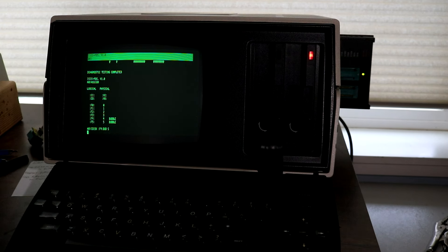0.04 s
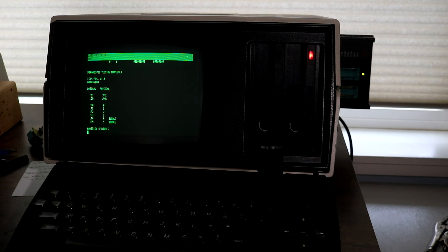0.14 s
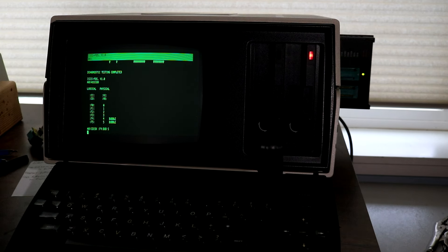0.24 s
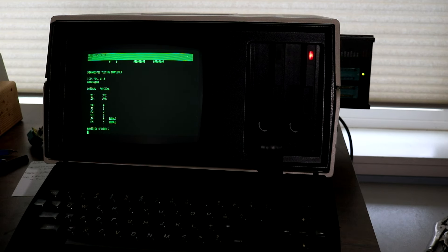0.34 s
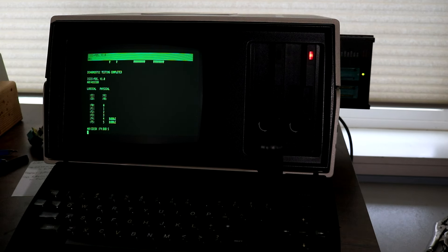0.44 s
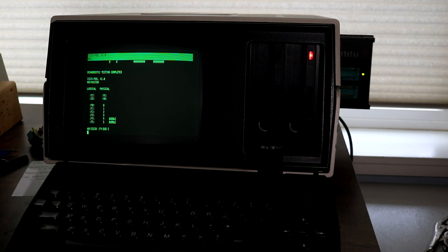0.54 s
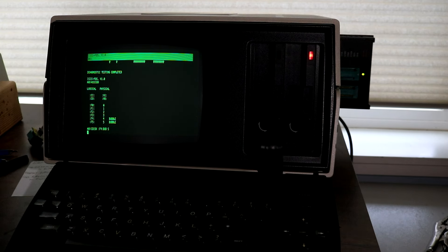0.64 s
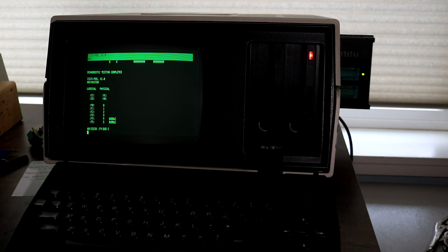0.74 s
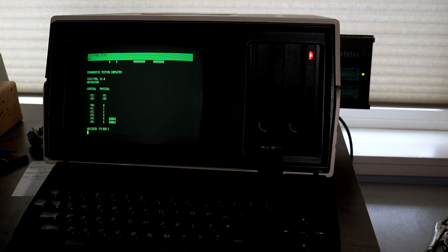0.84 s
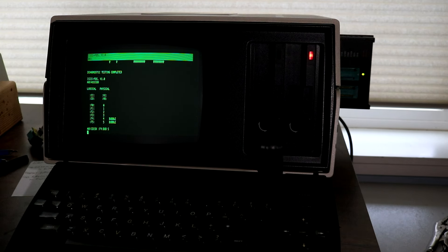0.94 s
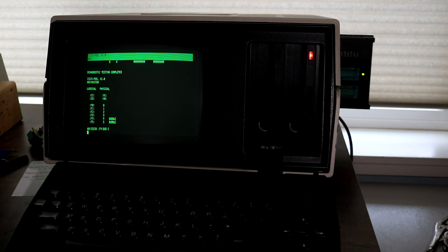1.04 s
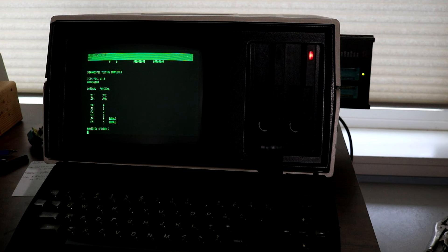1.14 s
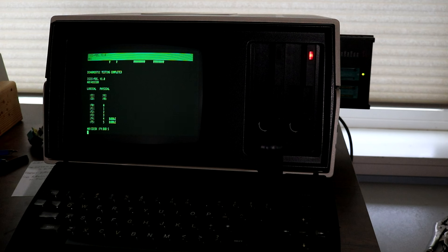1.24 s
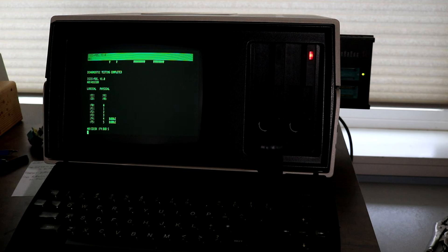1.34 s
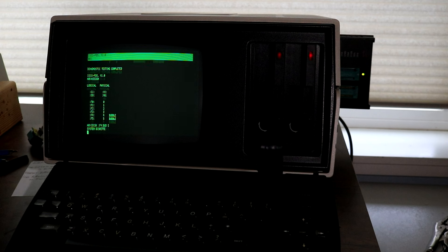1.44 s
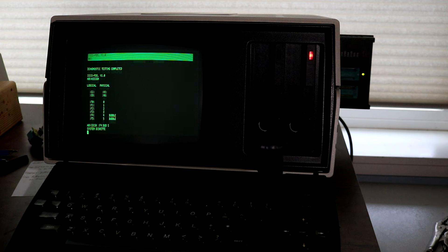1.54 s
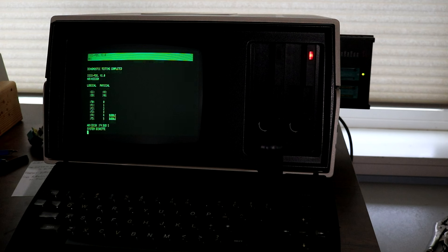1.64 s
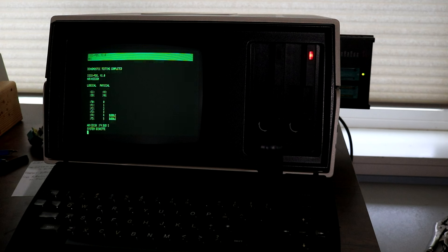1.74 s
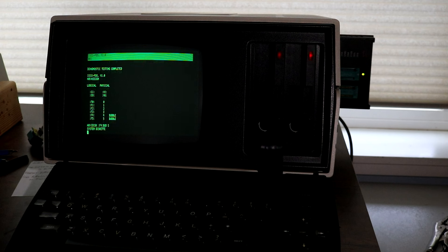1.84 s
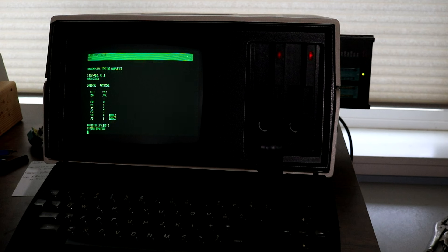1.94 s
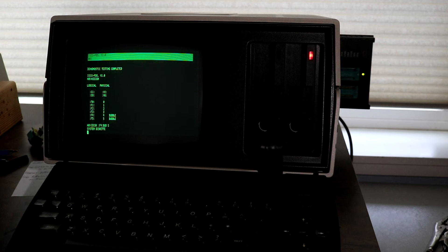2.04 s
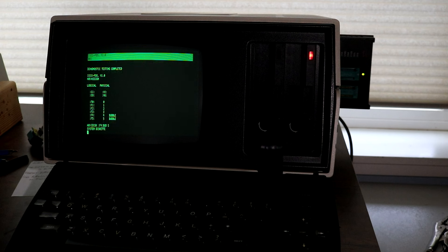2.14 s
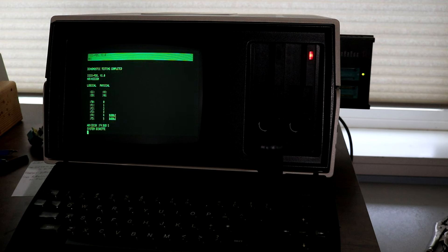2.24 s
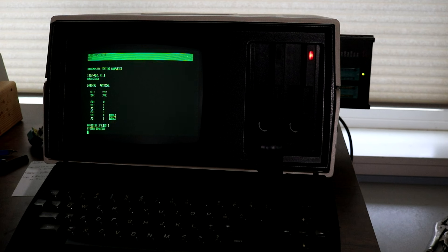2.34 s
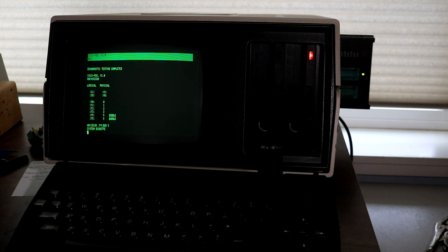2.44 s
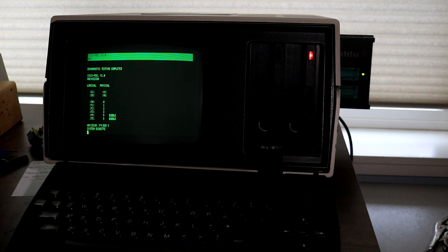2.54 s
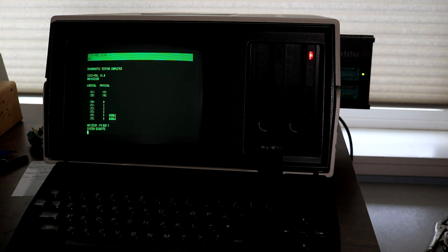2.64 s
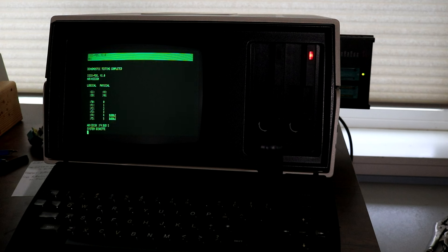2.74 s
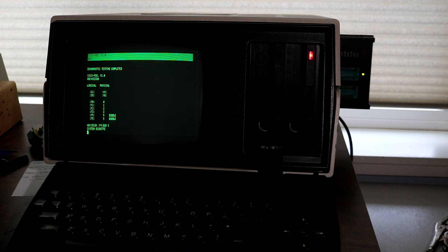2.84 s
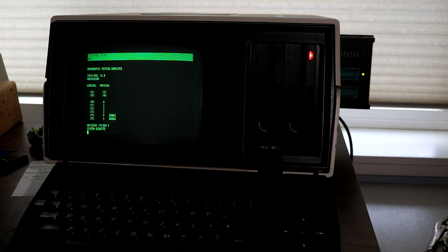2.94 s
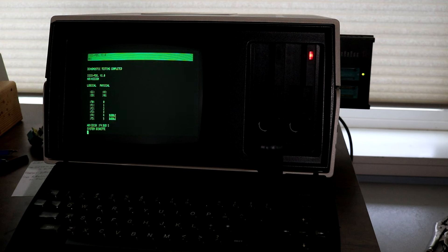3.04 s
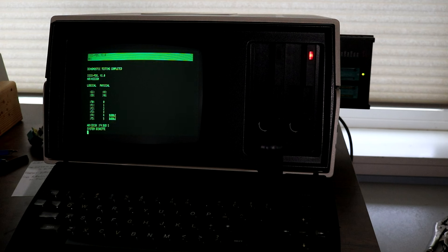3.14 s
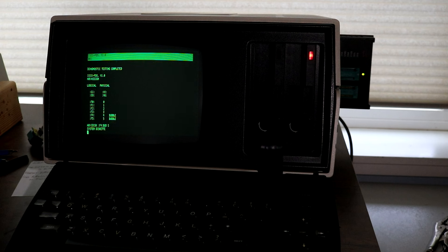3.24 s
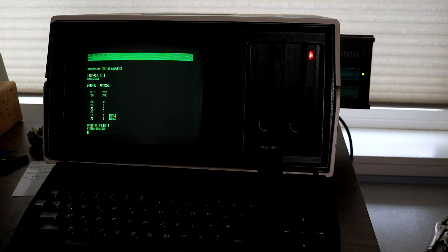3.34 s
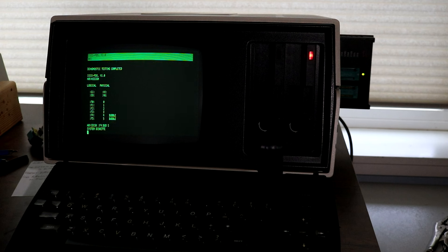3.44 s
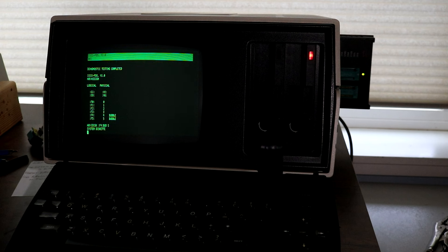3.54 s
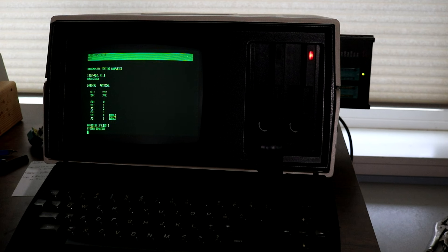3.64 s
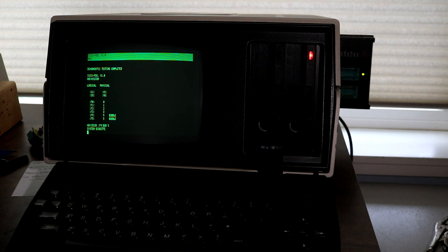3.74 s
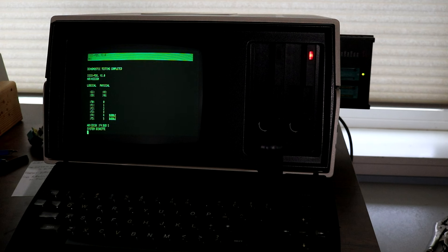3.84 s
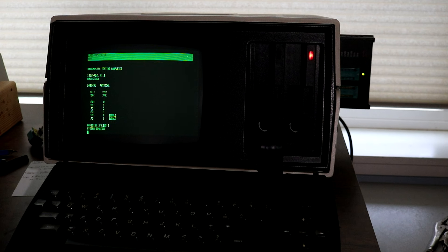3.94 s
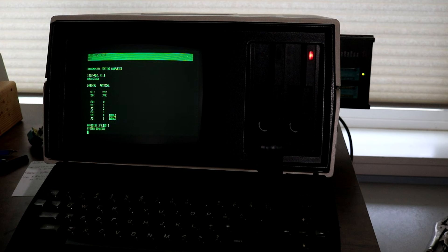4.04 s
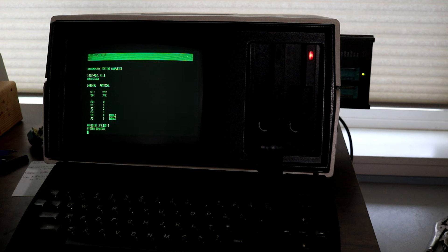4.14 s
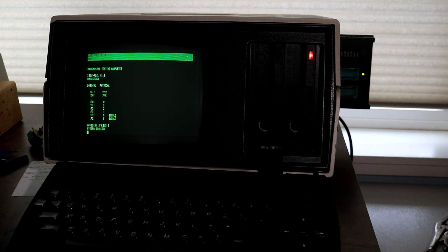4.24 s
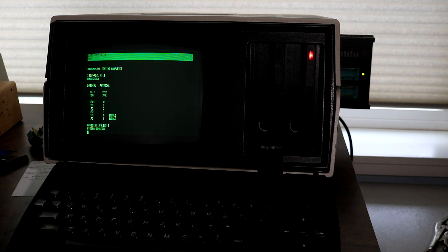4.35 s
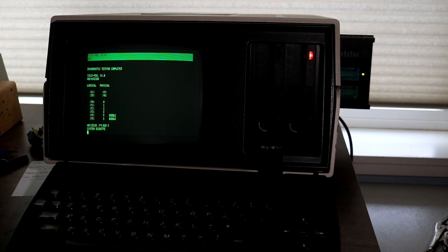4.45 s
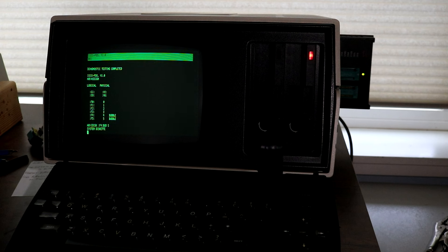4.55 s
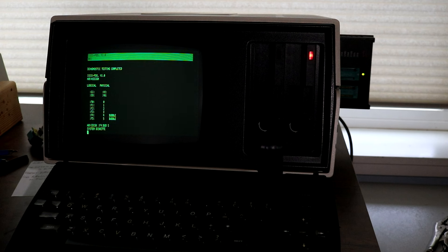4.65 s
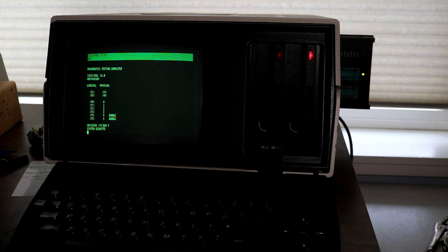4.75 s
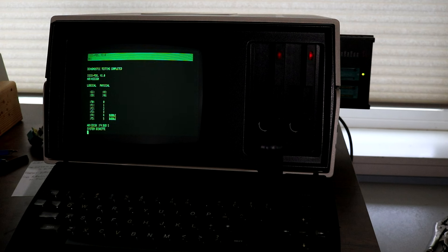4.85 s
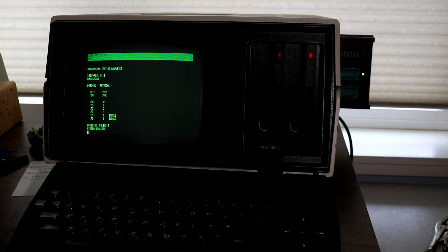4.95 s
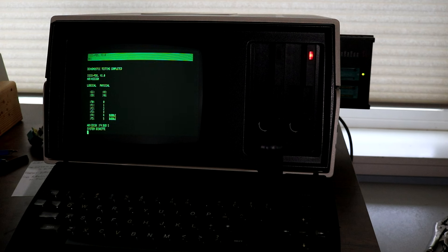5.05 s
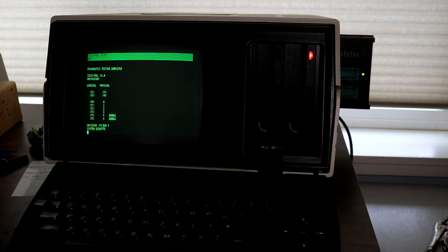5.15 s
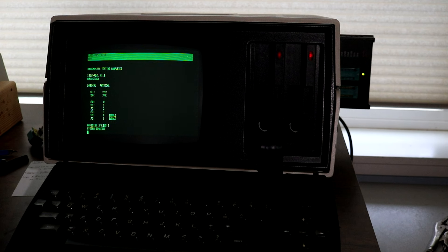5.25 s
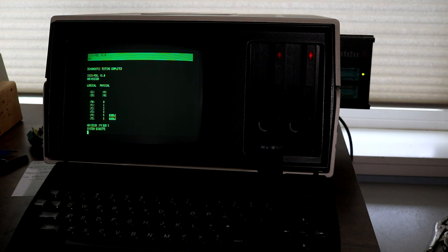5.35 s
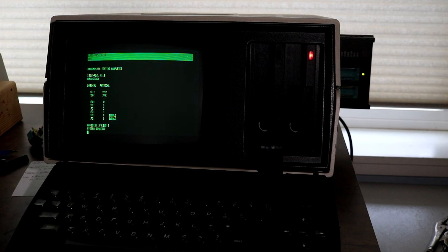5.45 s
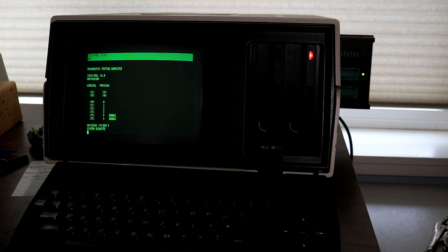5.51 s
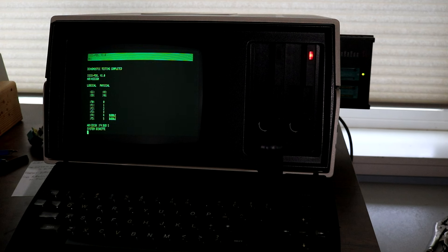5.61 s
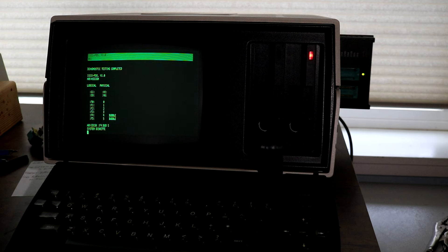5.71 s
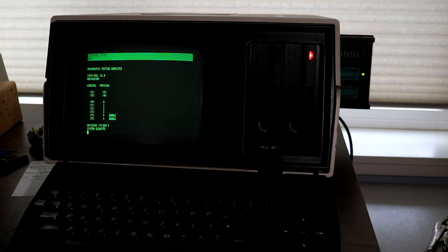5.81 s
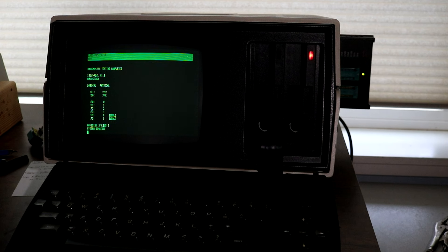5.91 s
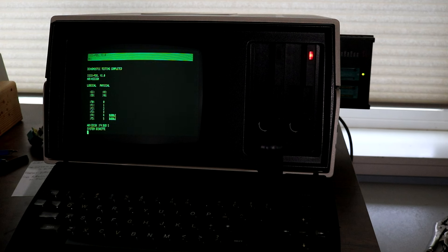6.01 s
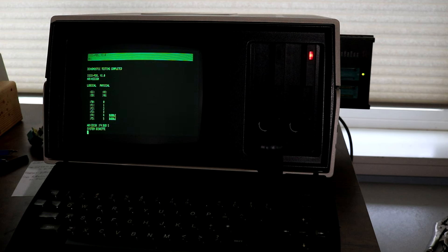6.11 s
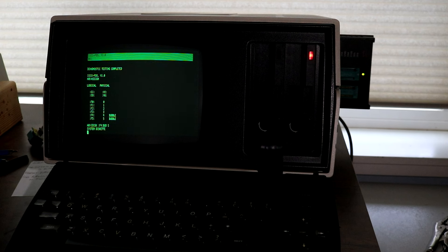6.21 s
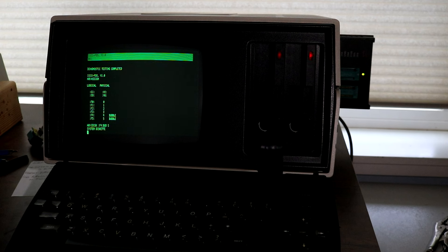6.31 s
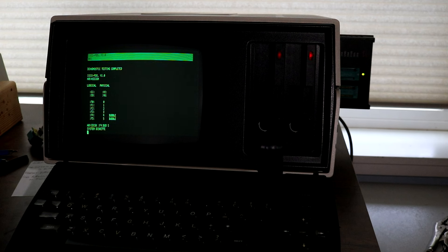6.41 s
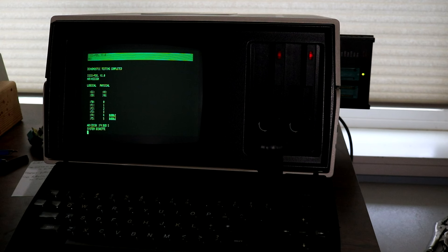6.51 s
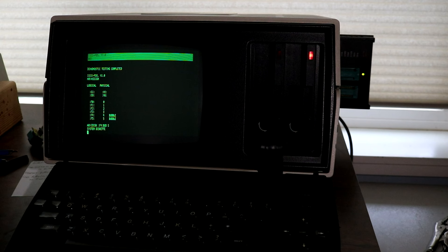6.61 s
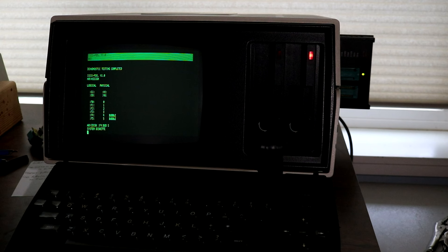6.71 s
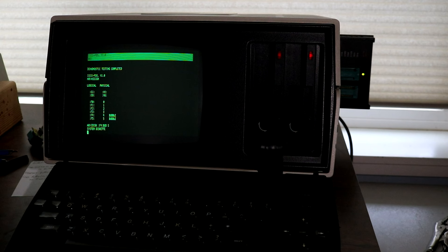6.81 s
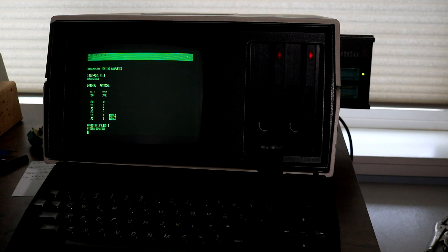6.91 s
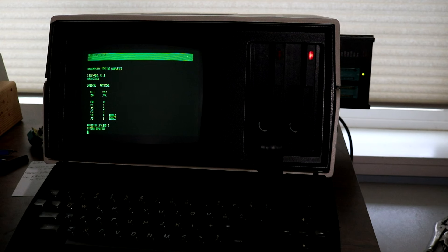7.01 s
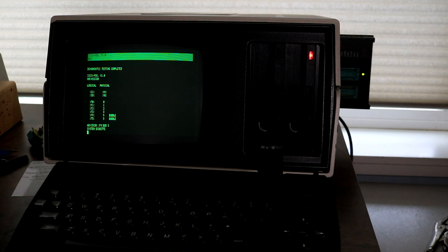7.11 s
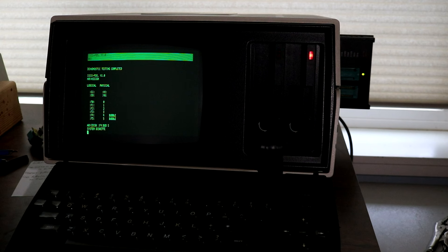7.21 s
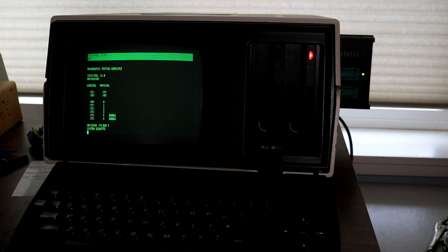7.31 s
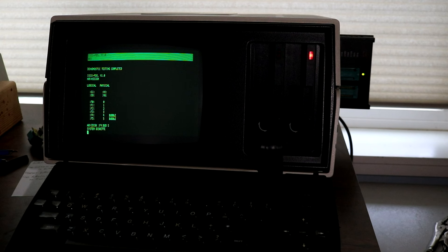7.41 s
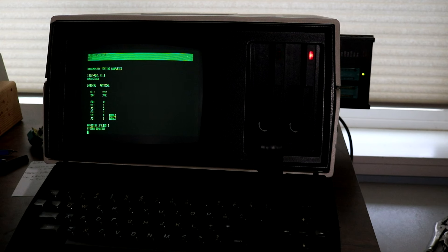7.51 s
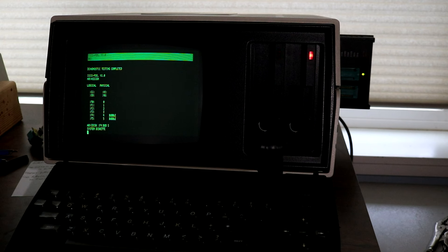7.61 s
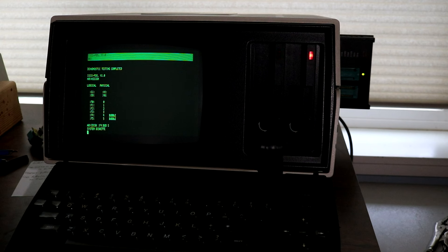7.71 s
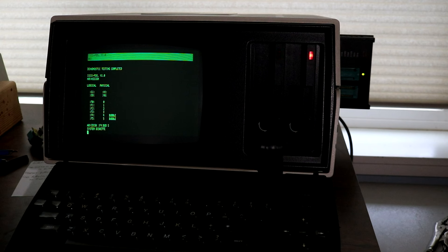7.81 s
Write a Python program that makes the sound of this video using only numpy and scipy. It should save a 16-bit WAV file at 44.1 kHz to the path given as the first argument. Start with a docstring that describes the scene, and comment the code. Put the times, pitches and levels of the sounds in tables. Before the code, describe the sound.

An old portable computer runs in a small room, with soft fan noise, a low mains hum and a thin, very high picture tube whine throughout. In the first second its floppy drive gives a few light ticks, a faint swish and a small double knock at about 0.7 seconds. At 1.4 seconds the head motor makes a very short, pitched buzz that ends in a hard, bright clack. A longer buzz follows at 1.8 and clacks just after 2 seconds. The drive then rests, apart from a small knock at 3.5. Four more buzzes, each about a quarter of a second long, start at 4.8, 5.2, 6.3 and 6.8 seconds, their tone shifting slightly as the head runs out and back. Each stops with a sharp clack and a brief rattle, the loudest sounds here. One last small knock comes at 7.5 seconds.

```python
"""A floppy drive's stepper motor runs the head to and fro in an old portable computer, in a small room.
Each seek is a periodic train of impacts on the frame, heard as a buzz with motor tones, and ends in a
hard clack against a stop. Short nudges, light ticks and one faint swish fall between the seeks.
Fan noise, mains hum and the picture tube's whine go on throughout; a limiter ducks after each clack."""
import sys
import numpy as np
from scipy import signal
from scipy.fft import rfft, irfft, next_fast_len
from scipy.io import wavfile
from scipy.ndimage import uniform_filter1d

SR = 44100
rng = np.random.default_rng(int(sys.argv[2]) if len(sys.argv) > 2 else 0)


def to_wav(s):
    """Save 16-bit WAV."""
    ch = np.atleast_2d(s).T  # columns
    pcm = np.round(np.clip(ch, -1, 1) * 32767)  # PCM
    wavfile.write(sys.argv[1], SR, pcm.astype(np.int16))


N = 347067
TAPS = 8192
HZ, TIME = np.fft.rfftfreq(TAPS, 1 / SR), np.arange(N) / SR


def amp(db):
    """Amplitude ratio: tenfold for every 20 dB."""
    return 10 ** (np.asarray(db) / 20)


def curve(points, hz=HZ):
    """Interpolation of (frequency_hz, value) points on a logarithmic frequency axis."""
    point_hz, value = np.transpose(points)
    return np.interp(np.log(hz + 1), np.log(point_hz + 1), value)


def peaks(rows):
    """Lorentzian curve in dB: one peak or dip for each row."""
    return sum(db / (1 + (2 * (HZ - hz) / width) ** 2) for hz, width, db in rows)


def add(mix, start_s, sound):
    """Superposition: a stereo sound joins the mix at start_s."""
    part = mix[:, round(start_s * SR):][:, :sound.shape[1]]
    part += sound[:, :part.shape[1]]


def colour(x, db):
    """Minimum-phase filtering at unit energy: only the shape of the dB curve counts."""
    log_gain = np.log(amp(np.maximum(db, db.max() - 100)))
    mirrored = np.r_[log_gain, log_gain[-2:0:-1]]
    response = np.exp(np.conj(signal.hilbert(mirrored)))
    taps = np.fft.ifft(response).real[:TAPS // 2]
    return signal.fftconvolve(x, taps[None] / np.linalg.norm(taps), axes=1)[:, :x.shape[1]]


def resonate(x, hz, width_hz):
    """Forced vibration of a damped resonator, with unit gain at its moving centre hz."""
    turn = np.exp(2j * np.pi * np.cumsum(hz) / SR)
    pole = np.exp(-np.pi * width_hz / SR)
    return 2 * (turn * signal.lfilter([1 - pole], [1, -pole], x / turn + 1e-18)).real


def ring(t60_s, rise_s=0.00021):
    """Modal overlap: a struck part with many close modes rings as decaying white noise of unit energy."""
    t = np.arange(TAPS) / SR
    burst = rng.standard_normal((2, TAPS)) * amp(-60 * t / t60_s) * (1 - np.exp(-t / rise_s))
    power = uniform_filter1d(abs(rfft(burst)) ** 2, size=70, axis=1)
    white = np.vstack([colour(side[None], -10 * np.log10(p + 1e-12)) for side, p in zip(burst, power)])
    return white / np.linalg.norm(white, axis=1, keepdims=True)


def impacts(events, spectrum, level_db, t60_s):
    """Impulse excitation: each (start_s, gain_db) blow rings a part with the given spectrum."""
    out = np.zeros((2, N))
    for start_s, gain_db in events:
        add(out, start_s, amp(level_db + gain_db) * ring(t60_s))
    return colour(out, curve(spectrum))


def stereo(x, coherence, balance, lag_samples=0):
    """Partial coherence: two unrelated signals blend into the sound at two close points; the left lags."""
    size = next_fast_len(x.shape[1] + 64)
    (a, b), hz = rfft(x, size), np.fft.rfftfreq(size, 1 / SR)
    angle = np.arccos(np.clip(curve(coherence, hz), -1, 1)) / 2
    mid, side = a * np.cos(angle), b * np.sin(angle)
    tilt = amp(curve(balance, hz) / 2)
    delay = np.exp(-2j * np.pi * hz * lag_samples / SR)
    return irfft(np.array([(mid + side) * tilt * delay, (mid - side) / tilt]), size)[:, :x.shape[1]]


def electrical_tone(hz, left_db, right_db):
    """Forced vibration at a fixed electrical frequency: a sine with the given rms levels."""
    return amp([[left_db], [right_db]]) * np.sqrt(2) * np.sin(2 * np.pi * hz * TIME)


# fan and room air: frequency_hz, gain_db
FAN_SPECTRUM = [(15, -71.5), (25, -43), (59, -16), (90, -13), (103, -10), (124, -6.5), (184, -5),
                (210, -11.5), (520, -14), (579, -16.5), (661, -15.5), (1070, -19), (1630, -23.5),
                (2250, -26), (14500, -39.5)]
# resonances of the case: frequency_hz, width_hz, gain_db
CASE_MODES = [(175.3, 23, 5), (298.7, 6.3, 5.5), (369, 10, 7), (593, 15, 7.5), (747, 4.8, 10.5),
              (1037, 12.7, 11), (1124, 14, 3.5), (2187, 85, 5.5)]
# left-right likeness of the fan: frequency_hz, coherence
FAN_COHERENCE = [(30, .8), (130, .99), (290, .96), (640, .8), (1400, .4), (3100, .2), (7000, .1)]
# balance of the fan: frequency_hz, left_minus_right_db
FAN_BALANCE = [(60, -5.5), (300, -1), (1300, -3.5), (2400, -2.5), (8000, 0.5)]
def fan(level_db=-45.5):
    """Turbulence: broadband air noise, filtered by the resonances of the case."""
    air = colour(rng.standard_normal((2, N)), curve(FAN_SPECTRUM) + peaks(CASE_MODES))
    return amp(level_db) * stereo(air, FAN_COHERENCE, FAN_BALANCE)


# reverberation time of the room: frequency_hz, t60_s
ROOM_DECAY = [(200, 0.49), (1000, 0.43), (3000, 0.32), (7000, 0.32), (14000, 0.28)]
def room(x, build_s=0.0017):
    """Reverberation: a diffuse tail of unit energy builds up, then decays exponentially in each band."""
    hz, t, bands = signal.stft(rng.standard_normal((2, SR // 2)), SR, nperseg=256)
    decay = amp(-60 * t / curve(ROOM_DECAY, hz)[:, None])
    onset = 1 - np.exp(-(t / build_s) ** 2)
    tail = signal.istft(bands * decay * onset, SR, nperseg=256)[1]
    return signal.fftconvolve(x, tail / np.linalg.norm(tail, axis=1, keepdims=True), axes=1)[:, :N]


# thin, bright rubbing: frequency_hz, gain_db
SWISH_SPECTRUM = [(500, -21), (2500, -6), (6000, -1), (10000, 0), (15000, -6)]
def swish(level_db=-54, start_s=0.24, rise_s=0.19, hold_s=0.14, fade_db_per_s=42):
    """Friction noise: a faint rubbing swells, holds and dies away."""
    age = np.maximum(TIME - start_s, 0)
    swell = np.sqrt(np.minimum(age / rise_s, 1))
    fade_db = -fade_db_per_s * np.maximum(age - rise_s - hold_s, 0)
    return swell * amp(level_db + fade_db) * colour(rng.standard_normal((2, N)), curve(SWISH_SPECTRUM))


# stray ticks of the mechanism: start_s, gain_db
STRAY_TICKS = [(0.0697, -14), (0.254, 1), (0.263, 2), (0.593, -16), (4.739, -13)]
# a light tick: frequency_hz, gain_db
TICK_SPECTRUM = [(590, -44), (1000, -17), (1590, -9), (2530, -15), (3000, -10.5), (6340, -6.5),
                 (9640, -5.5), (11600, -14.5), (15000, -14)]
def light_ticks(latch_s=0.016, latch_db=4):
    """Latch click: a head-load latch snaps with a light tick early in each seek; a few ticks are stray."""
    latches = [(start + latch_s, latch_db) for start, _, _ in HEAD_SEEKS]
    return impacts(STRAY_TICKS + latches, TICK_SPECTRUM, level_db=-9.5, t60_s=0.044)


# two-step nudges of the head: start_s, gain_db
HEAD_NUDGES = [(0.7289, 1.5), (3.5288, 2), (7.5296, 3.5)]
# a dull knock: frequency_hz, gain_db
KNOCK_SPECTRUM = [(200, -53), (520, -10), (700, 5), (1200, 3.5), (1700, -3), (2400, -10), (3200, -9),
                  (4300, -5), (6000, -15), (15000, -25)]
def knocks(settle_s=0.0095, rebound_s=0.0082, rebound_db=-3.5, stray_s=0.077, stray_db=-7):
    """Inelastic impact: the carriage knocks and rebounds once after each nudge; one knock is stray."""
    settles = [(s + settle_s, db) for s, db in HEAD_NUDGES]
    rebounds = [(s + rebound_s, db + rebound_db) for s, db in settles]
    return impacts([(stray_s, stray_db)] + settles + rebounds, KNOCK_SPECTRUM, level_db=-11, t60_s=0.057)


def panel(x, pitch_hz=1139, width_hz=2.6):
    """Sympathetic resonance: a lightly damped case panel rings on after the blows."""
    return x + resonate(x, np.full(N, pitch_hz), width_hz)


STEP_HZ = 162.7
SEEK_GAIN_DB = {"out": 2, "back": 1.4}
# rotor tones on the way out and on the way back: nominal_pitch_hz, gain_db
OUTWARD_TONES = [(325, -50), (407, -53), (488, -46), (529, -50), (732, -53), (854, -43), (895, -44),
                 (1017, -52), (1098, -53.5), (1505, -56), (1546, -51), (1830, -47)]
RETURN_TONES = [(325, -48), (488, -49), (651, -45), (732, -54), (814, -42), (976, -53), (1098, -44.5),
                (1139, -48), (1302, -59), (1464, -47), (1546, -52), (1627, -48.5)]
def motor_tones(level_db=-1, swell_s=0.023, fade_s=0.034, waver_db=3):
    """Harmonic series: the rotor sings on multiples of its four-step cycle, each wavering in level."""
    out, cycle_hz = np.zeros((2, N)), STEP_HZ / 4
    for start, stop, way in HEAD_SEEKS:
        run_s = stop - start
        t = np.arange(0, run_s + 0.15, 1 / SR)
        swell = 1 - np.exp(-np.minimum(t, run_s) / swell_s)
        fade = np.exp(-np.maximum(t - run_s, 0) / fade_s)
        for hz, tone_db in OUTWARD_TONES if way == "out" else RETURN_TONES:
            phase, waver_phase, pace = rng.random(3)
            waver = waver_db * np.sin(2 * np.pi * (waver_phase + (2 + 5 * pace) * t))
            harmonic_hz = round(hz / cycle_hz) * cycle_hz
            tone = np.sqrt(2) * np.sin(2 * np.pi * (harmonic_hz * t + phase))
            gain = amp(level_db + SEEK_GAIN_DB[way] + tone_db + waver)
            add(out, start, np.tile(gain * swell * fade * tone, (2, 1)))
    return out


def carriage(x, home_hz=1130, far_hz=820, width_hz=160, gain_db=-2, full_stroke_s=0.17):
    """Variable resonance: the carriage's natural frequency falls as the head moves out."""
    path = []  # time_s, position from 0 (home) to 1 (far end)
    for start, stop, way in HEAD_SEEKS:
        travel = min((stop - start) / full_stroke_s, 1)
        path += [(start, 1 - travel), (stop, 1)] if way == "out" else [(start, travel), (stop, 0)]
    position = np.interp(TIME, *np.transpose(path))
    return x + amp(gain_db) * resonate(x, home_hz + (far_hz - home_hz) * position, width_hz)


# long runs of the head, each ending against a stop: start_s, stop_s, direction
HEAD_SEEKS = [(1.434, 1.5331, "out"), (1.826, 2.0677, "back"), (4.79, 5.0233, "out"),
              (5.219, 5.468, "back"), (6.347, 6.595, "out"), (6.831, 7.0657, "back")]
# one motor step: frequency_hz, gain_db
STEP_SPECTRUM = [(150, -33.5), (320, -14.5), (520, -7.5), (610, -13), (720, -5), (1000, -6.5), (1650, -7.5),
                 (1950, -13.5), (2250, -7), (3300, -9.5), (4100, -7.5), (4700, -9.5), (8200, -12.5),
                 (14500, -30.5)]
# resonances of the drive frame: frequency_hz, width_hz, gain_db
FRAME_MODES = [(670, 68, 0.5), (1190, 610, 3.5), (1530, 150, 0.5), (2316, 350, 9.5), (2900, 130, 7),
               (3680, 90, 5), (4140, 830, 6.5), (5453, 200, 2.5), (12600, 1000, 9)]
def stepper(level_db=-29, coil_db=2, rattle_db=3, uneven_db=1.5, first_db=-7,
            t60_s=0.031, rise_s=0.0028, jitter_s=0.00015, brake_s=0.003, nudge_s=0.01):
    """Impact train: steps knock the frame, each of four coil phases differently; the carriage rattles."""
    seeks = [(start, stop - brake_s, SEEK_GAIN_DB[way]) for start, stop, way in HEAD_SEEKS]
    nudges = [(start, start + nudge_s, db) for start, db in HEAD_NUDGES]
    out = np.zeros((2, N))
    for start, end, db in seeks + nudges:
        common, *coils = [ring(t60_s, rise_s) for _ in range(5)]
        for k, step_s in enumerate(np.arange(start, end, 1 / STEP_HZ)):
            late, hard = rng.standard_normal(2)
            knock = common + amp(coil_db) * coils[k % 4] + amp(rattle_db) * ring(t60_s, rise_s)
            force_db = db + uneven_db * hard + first_db / (1 + k) ** 2  # softer when starting from rest
            add(out, step_s + jitter_s * late, amp(force_db) * knock)
    power_norm = np.sqrt(SR / STEP_HZ / (1 + amp(coil_db) ** 2 + amp(rattle_db) ** 2))
    buzz = colour(out, curve(STEP_SPECTRUM) + peaks(FRAME_MODES))
    return amp(level_db) * power_norm * carriage(buzz)


# the blow on the stop: frequency_hz, gain_db
CLACK_SPECTRUM = [(100, -30.5), (600, -25), (1150, -22.5), (1800, -19.5), (2300, -9.5), (3200, -3.5),
                  (4200, -2), (4900, -5), (5800, -4), (7800, -4), (8700, -8), (10200, -15.5), (11200, -9),
                  (15000, -31)]
# narrow peaks and dips in the clack's direct sound: frequency_hz, width_hz, gain_db
CLACK_DIRECT_COLOUR = [(1180, 67, 21), (2330, 520, 9), (2950, 690, -3), (3570, 190, 10), (4000, 430, 7.5),
                       (5320, 450, 6.5), (6900, 130, 3), (8400, 160, -21)]
def clacks(level_db=13.5, t60_s=0.02, rattle_db=-3.5, rattle_t60_s=0.038, wet_db=-8):
    """Hard collision: each seek hits its stop with the same crack, then the frame rattles loosely."""
    out, crack = np.zeros((2, N)), ring(t60_s, rise_s=0.00016)
    for _, stop, _ in HEAD_SEEKS:
        rattle = amp(rattle_db) * ring(rattle_t60_s, rise_s=0.016)
        add(out, stop, amp(level_db) * (crack + rattle))
    out = colour(out, curve(CLACK_SPECTRUM))
    direct = colour(out, peaks(CLACK_DIRECT_COLOUR))  # interference at the listening position
    return direct + amp(wet_db) * room(out)


# left-right likeness of the drive: frequency_hz, coherence
DRIVE_COHERENCE = [(200, 0.72), (700, 0.85), (1400, 0.63), (3100, 0.55), (7000, 0.31), (15000, 0.1)]
# balance of the drive: frequency_hz, left_minus_right_db
DRIVE_BALANCE = [(200, -4.5), (700, -0.8), (1300, -1), (2400, -4.5), (4400, -1), (8000, -2), (14000, -1)]
def scene(wet_db=-8, tick_wet_db=-2):
    """Superposition: the drive and its reverberation, over fan, mains hum and picture-tube whine."""
    works = stepper() + knocks() + swish()
    ticks = light_ticks()
    reverb = room(amp(wet_db) * works + amp(tick_wet_db) * ticks)
    drive = panel(works + ticks + reverb + clacks())
    drive = stereo(drive, DRIVE_COHERENCE, DRIVE_BALANCE, lag_samples=1.7)
    mains_hum = electrical_tone(hz=120, left_db=-50.5, right_db=-50)
    tube_whine = electrical_tone(hz=15600.8, left_db=-41.5, right_db=-57)
    return drive + motor_tones() + fan() + mains_hum + tube_whine


def record(dry, limit_db=-7, attack_s=0.0078, recovery_s=0.1, cutoff_hz=16300):
    """Peak limiting: the gain dips on each peak and ramps back; clipping and a low-pass follow."""
    cut = np.maximum(1 - amp(limit_db) / (abs(dry).max(0) + 1e-9), 0)
    held = np.maximum.accumulate(cut + TIME / recovery_s) - TIME / recovery_s
    pole = np.exp(-1 / (attack_s * SR))
    gain = 1 - signal.lfilter([1 - pole], [1, -pole], held)
    clipped = np.clip(dry * gain, -0.95, 0.95)
    lowpass = signal.firwin(511, cutoff_hz, window=("kaiser", 9), fs=SR)
    return signal.oaconvolve(clipped, lowpass[None], "same")


dry = scene()
out = record(dry)
to_wav(out)
```